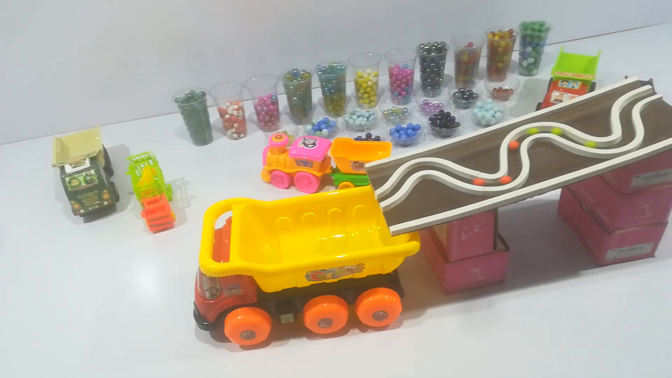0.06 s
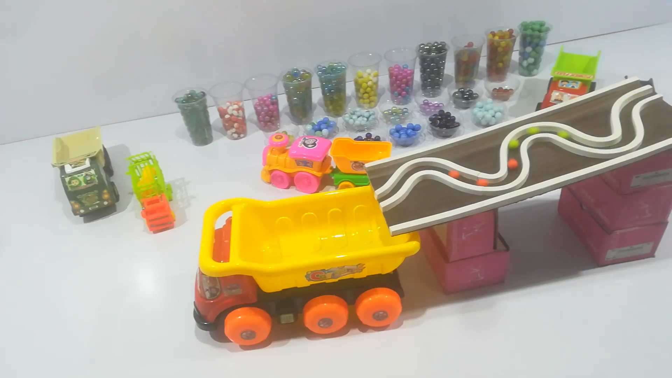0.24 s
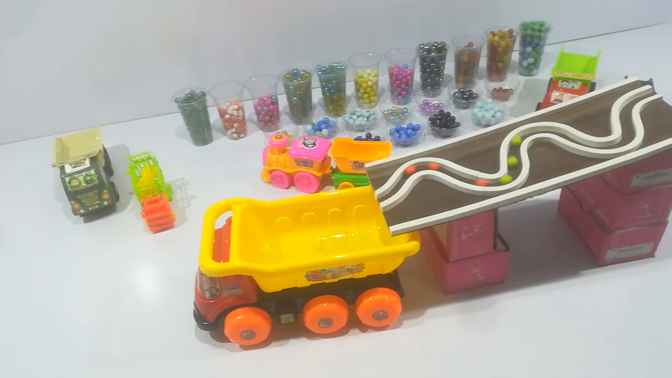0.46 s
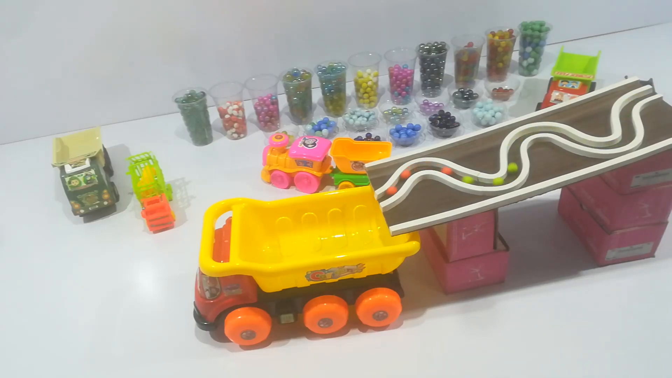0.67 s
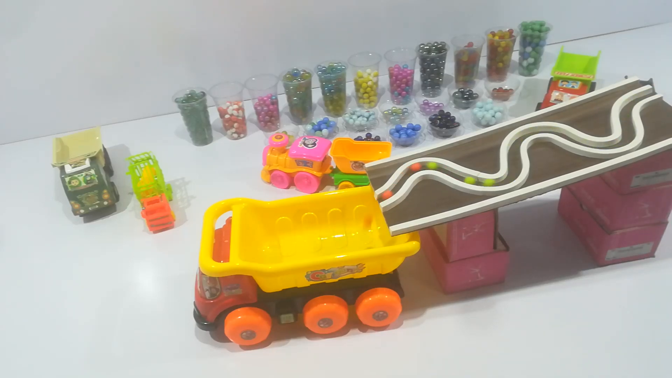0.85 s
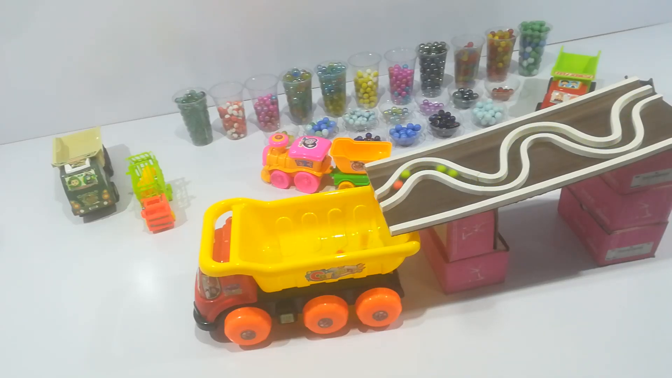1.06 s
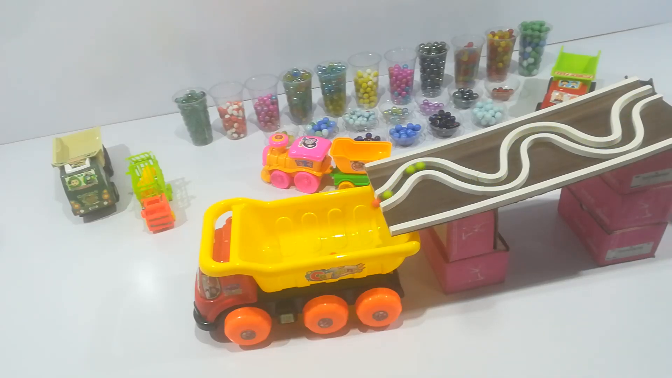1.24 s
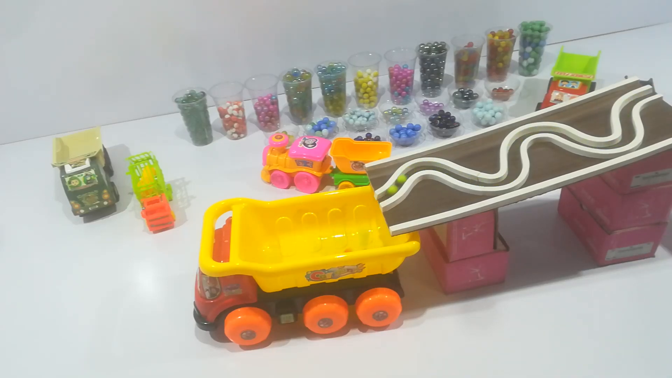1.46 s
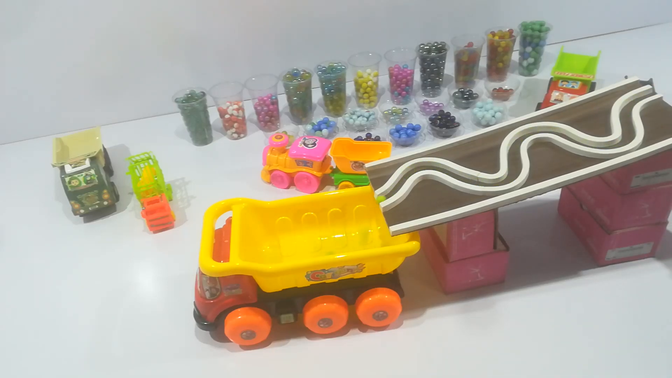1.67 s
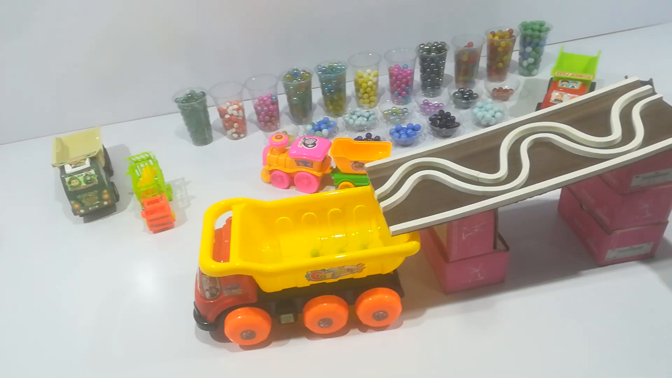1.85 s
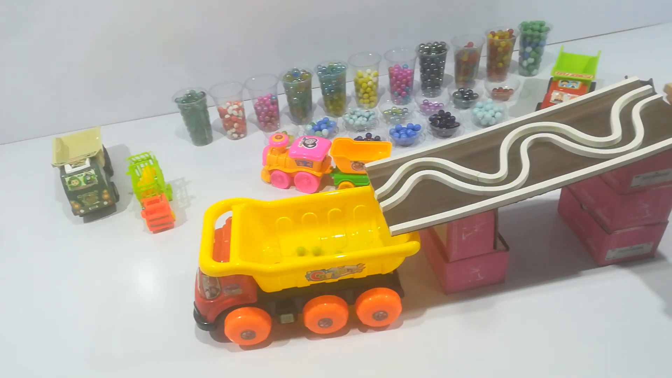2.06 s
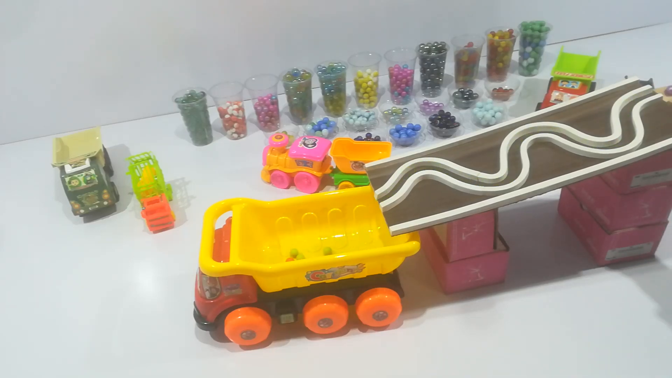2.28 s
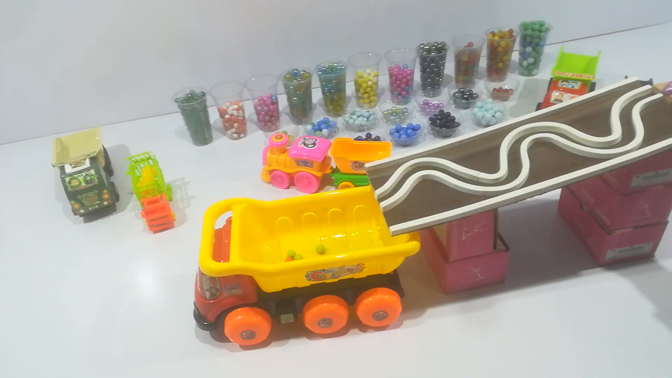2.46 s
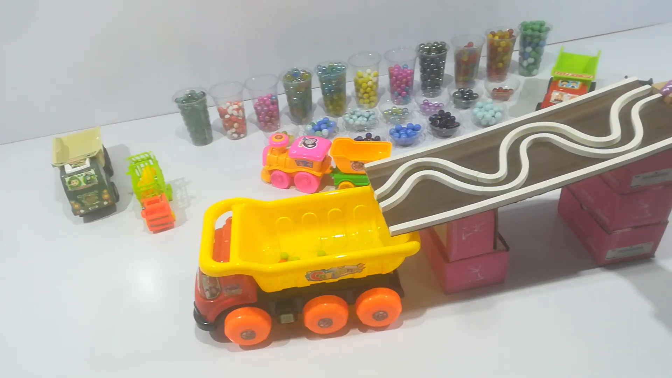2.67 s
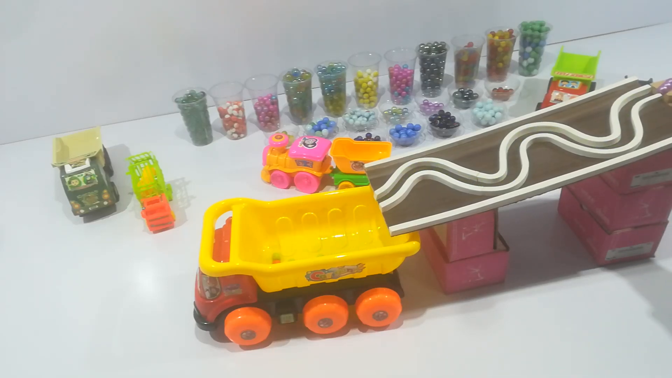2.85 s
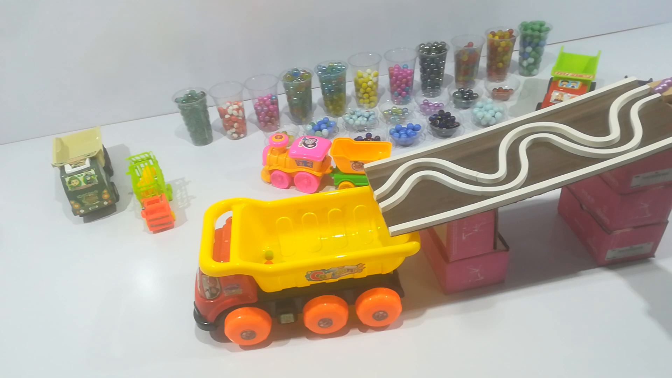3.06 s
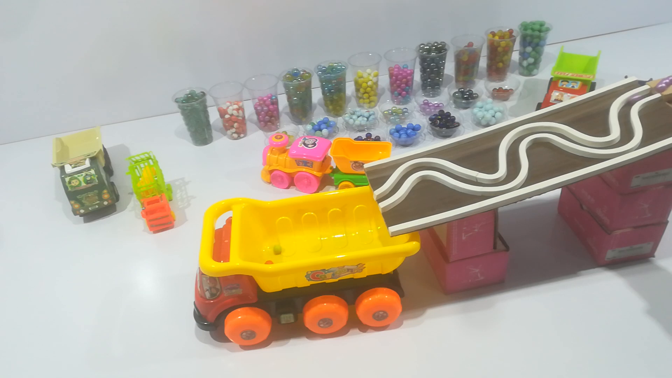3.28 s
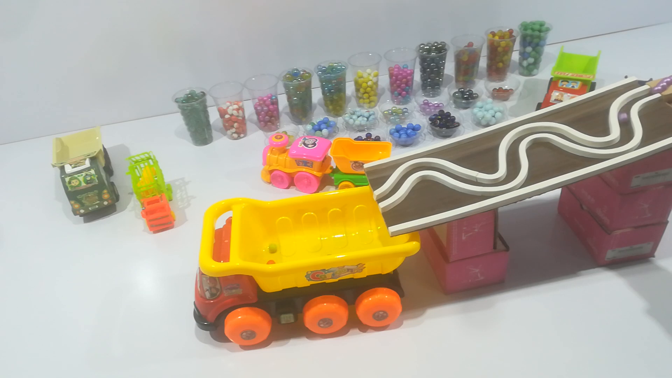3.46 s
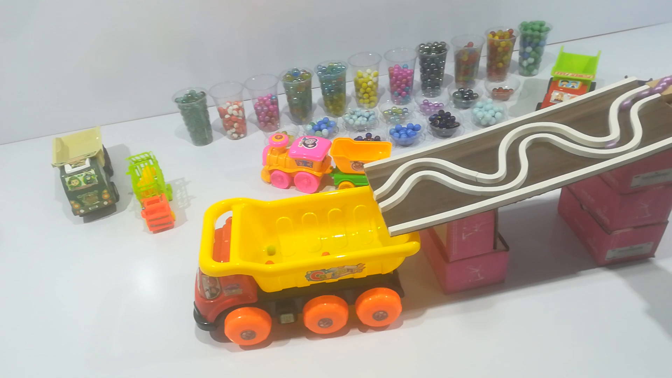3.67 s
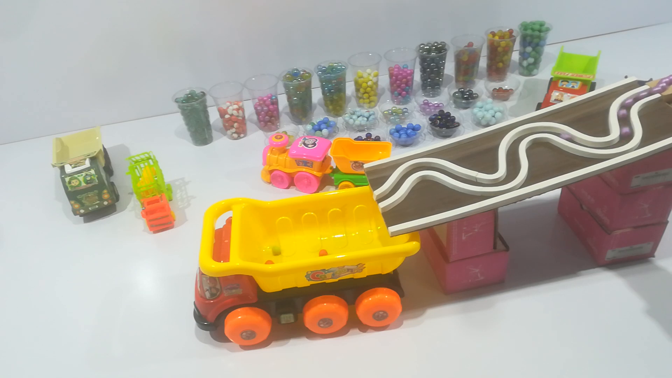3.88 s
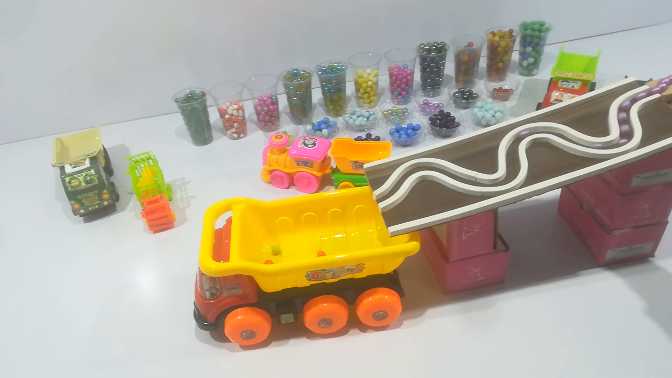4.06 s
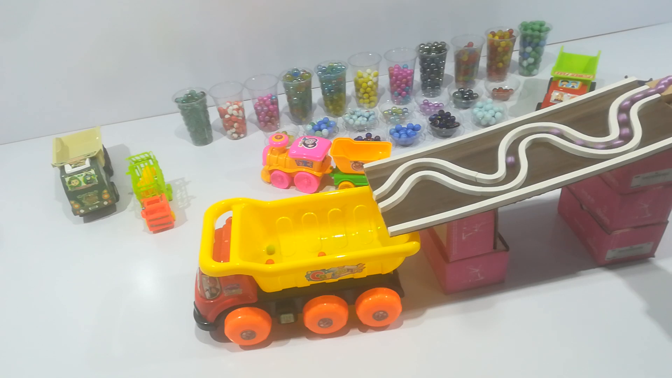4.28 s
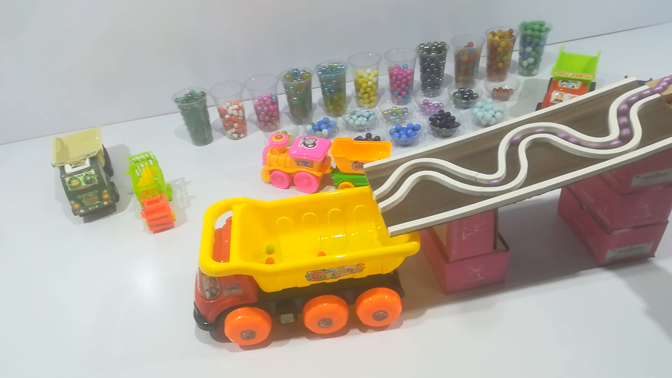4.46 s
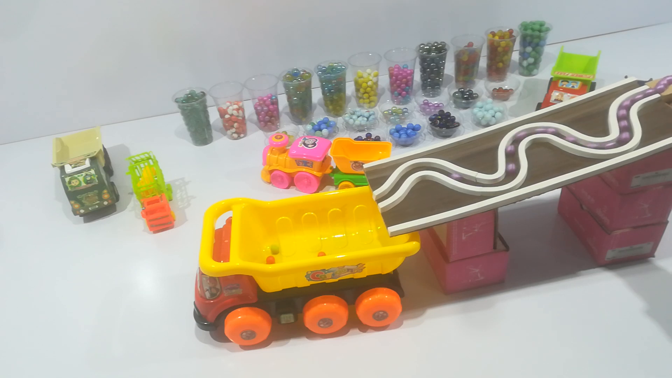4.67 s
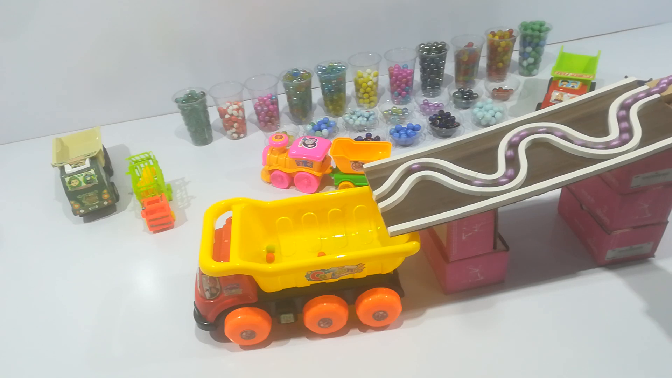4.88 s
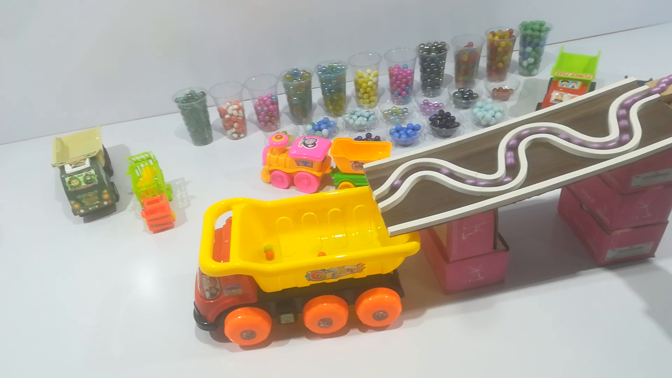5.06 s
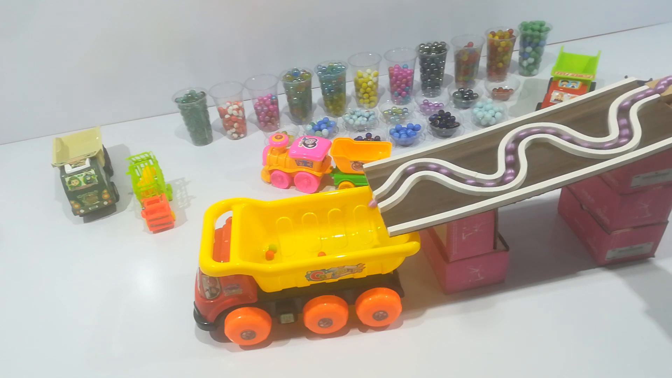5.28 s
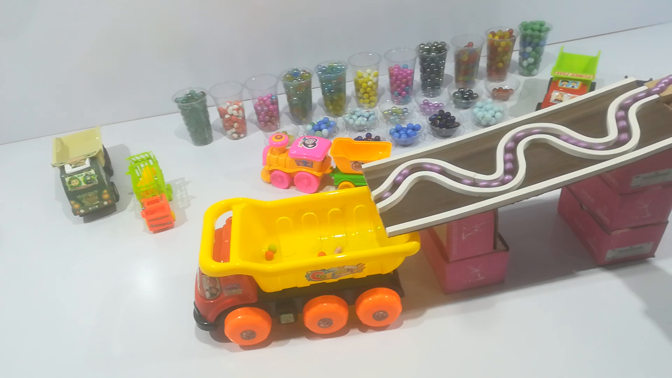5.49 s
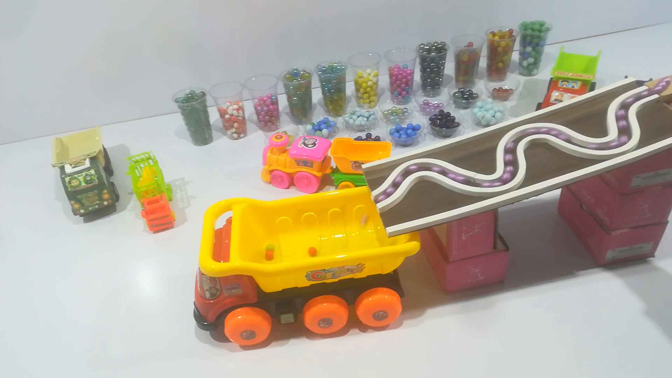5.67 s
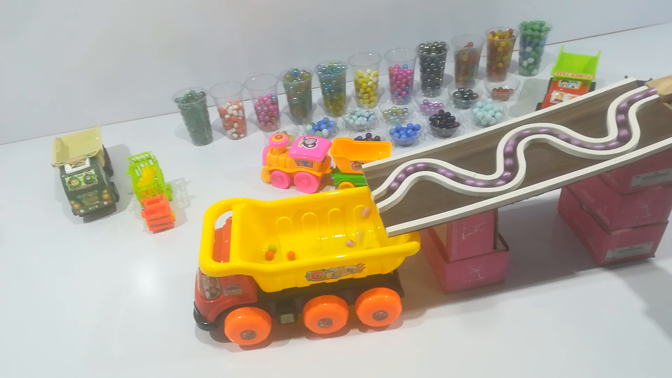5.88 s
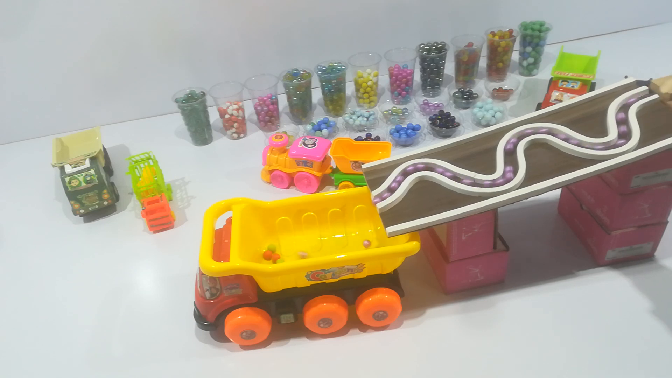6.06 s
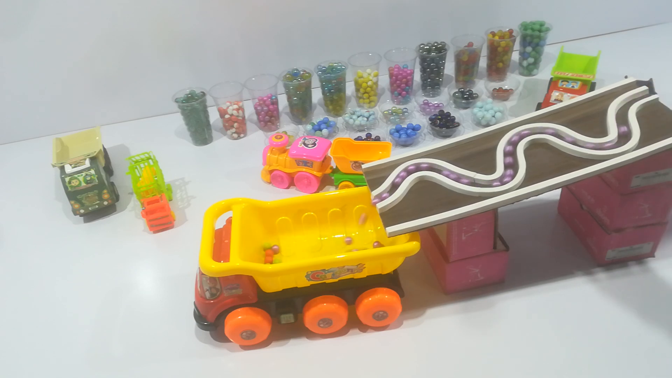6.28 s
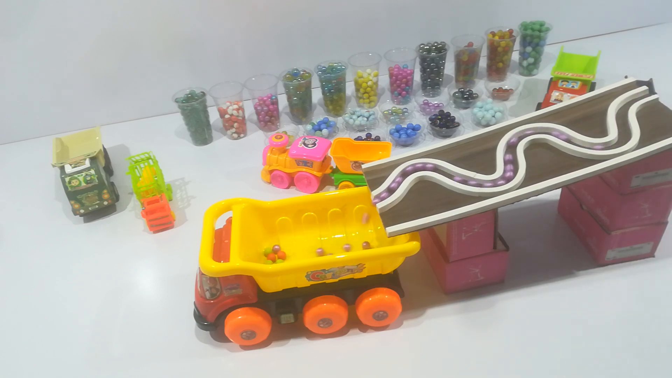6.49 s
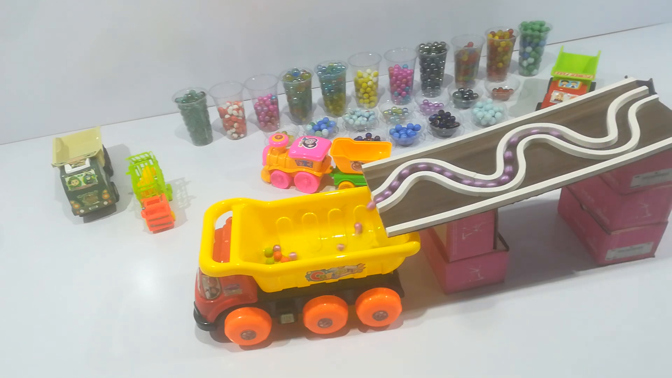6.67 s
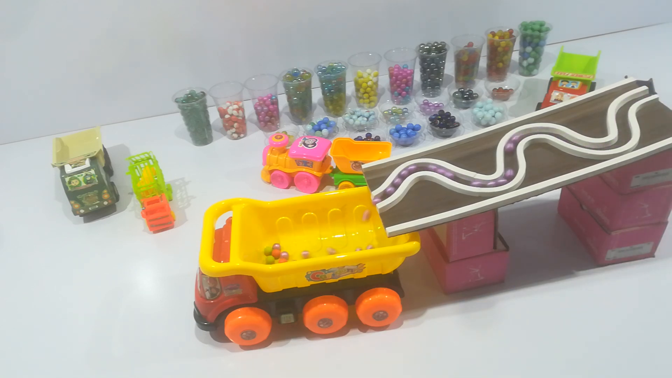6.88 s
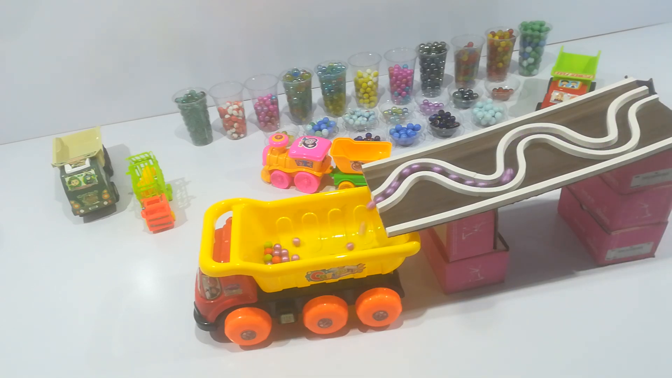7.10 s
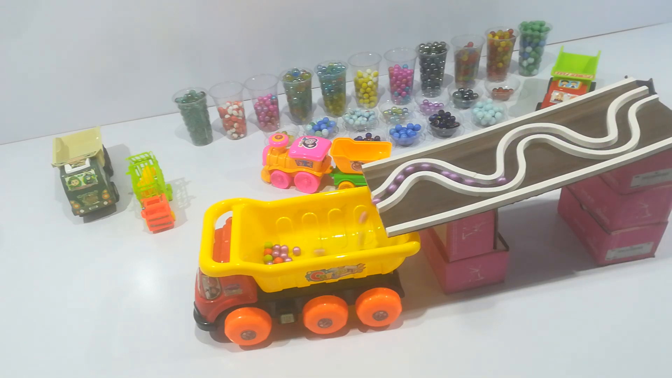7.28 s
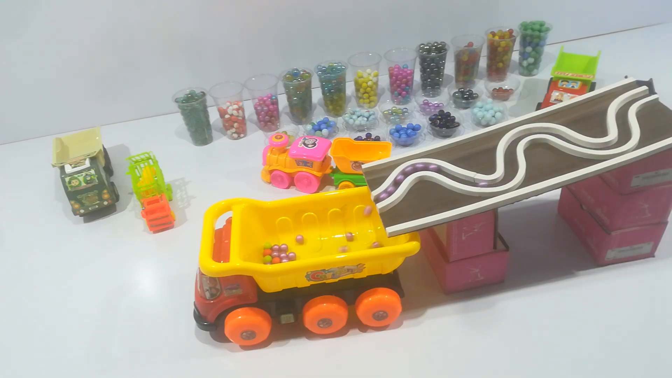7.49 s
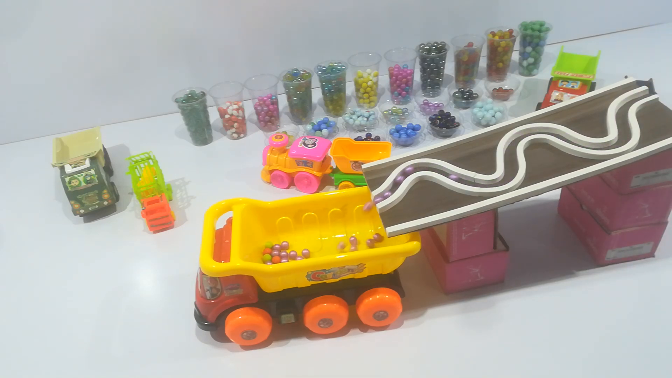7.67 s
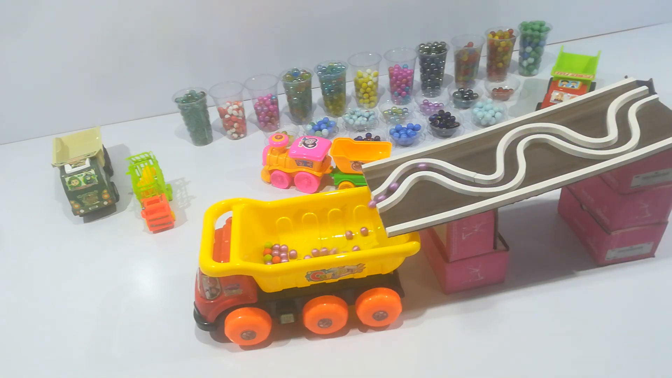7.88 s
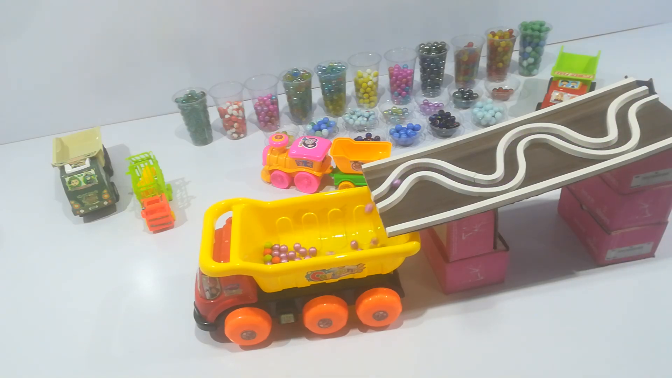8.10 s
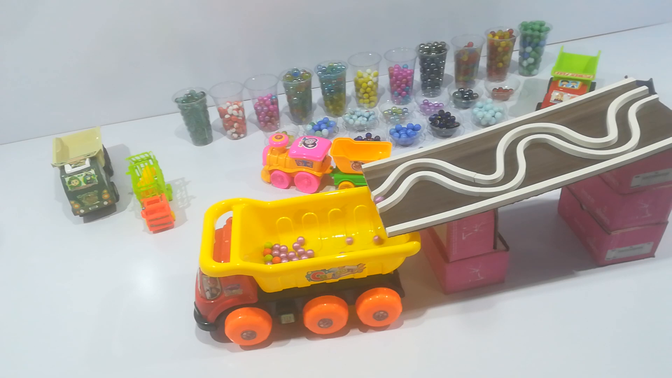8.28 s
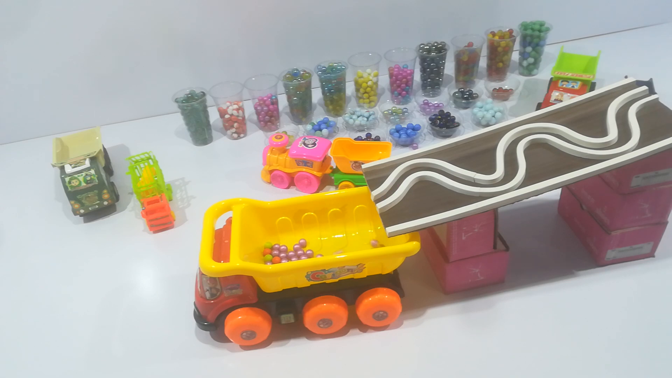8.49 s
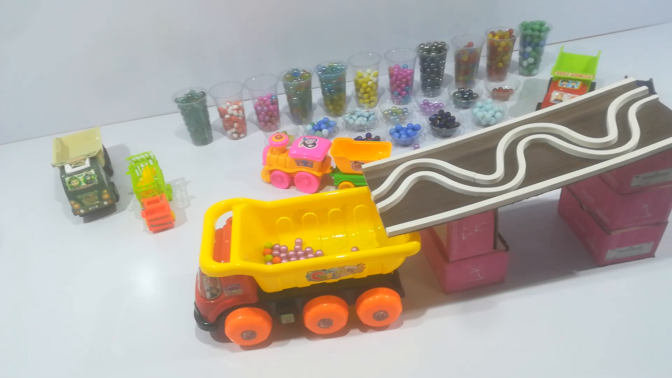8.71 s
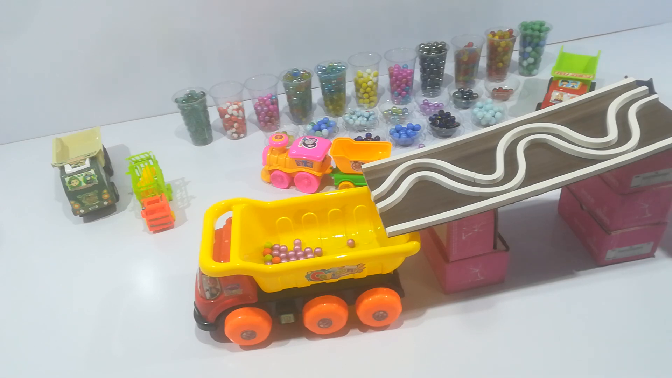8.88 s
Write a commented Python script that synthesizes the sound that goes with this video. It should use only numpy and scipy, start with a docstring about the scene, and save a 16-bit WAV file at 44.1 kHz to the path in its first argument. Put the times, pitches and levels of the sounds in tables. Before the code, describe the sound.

A small quiet room, heard close in stereo, with faint hiss, a thin high whine and low room air. From 0 seconds a few glass marbles roll softly down a winding plastic track with light ticks. From about 0.9 to 2.1 they drop into a hollow plastic truck bed in loud, dry, boxy clacks roughly a tenth of a second apart, bouncing and rolling out by 2.3. The hiss eases and it is nearly still until 3.1, when light taps, clicks and short bright glass scrapes mark marbles being placed on the track. Rolling builds from 4 with sharper clinks. A hard knock at 5.3 starts a denser batch: irregular, rapid, fuller clacks with glass ticks and rattling, busiest from 6 to 8. Landings thin out by 8.5; a last marble drones dully across the bed, slowing, and a very faint singing rub ends it near 8.9.

```python
"""First, glass marbles roll down a winding plastic track in a small room (shaped noise of tiny impacts).
They drop into the hollow bed of a plastic toy truck, bounce, roll and click (struck modes, noise bursts).
Then marbles knock as they are set on the track, and a larger, denser batch runs down and lands.
A last marble drones across the bed and a light rub sings; faint whine, hiss and room air lie below."""
import sys
import numpy as np
from scipy import signal
from scipy.fft import rfft, irfft, next_fast_len
from scipy.io import wavfile
from scipy.ndimage import uniform_filter1d

SR = 44100
rng = np.random.default_rng(int(sys.argv[2]) if len(sys.argv) > 2 else 0)


def inscribe(sig):
    """Save sig as 16-bit PCM at rate SR to the path in sys.argv[1].

    A 1-D sig is mono; a 2-D sig holds one channel per row.
    Samples are clipped to [-1, 1] before scaling.
    """
    pcm = np.round(np.clip(np.atleast_2d(sig).T, -1, 1) * 32767)
    wavfile.write(sys.argv[1], SR, pcm.astype(np.int16))


N = 394254
RING_S, CUTOFF_HZ = 0.4, 16000
TIME = np.arange(N) / SR
AGE = np.arange(int(RING_S * SR)) / SR  # seconds since a blow
LEFT_RIGHT = np.array([[1], [-1]])
USUAL_CLACK_HZ = 1537
LOADED_FROM_S = 5.0  # from here marbles already lie in the bed

# marbles landing and bouncing in the bed: (time [s], blow level [dB], thud level [dB], clack pitch [Hz])
DROPS = [(0.8804, -2.5, -36.5, 1630), (0.999, -12, -28.5, 1290), (1.046, -3, -29, 1566),
         (1.1667, -9.5, -28, 1240), (1.2859, -26.5, -42, 1670), (1.3142, -19, -52.5, 1560),
         (1.3496, -3.5, -30, 1770), (1.4456, -1.5, -30, 1570), (1.5703, -10, -27, 1220),
         (1.6831, -1.5, -34, 1570), (1.8031, -10, -30, 1300), (1.8255, -2.5, -29.5, 1580),
         (1.9519, -9, -27.5, 1480), (1.9882, -20.5, -34.5, 1340), (2.026, -26, -44, 1800),
         (2.0794, -27.5, -54, 1770), (2.172, -37, -57, 1210), (2.2774, -46, -66, 1484),
         (5.3475, -4, -22, 1395), (5.4863, -10.5, -25.5, 1630), (5.6929, -5, -20.5, 1460),
         (5.8196, -1.5, -20.5, 1300), (5.8888, -2, -23.5, 1420), (5.9511, -6, -23, 1530),
         (6.0017, -12.5, -23, 1100), (6.0373, -11.5, -31, 1260), (6.0581, -11.5, -39.0, 1800),
         (6.1913, -3.5, -22.5, 1560), (6.2515, -6, -22, 1410), (6.3237, -2, -22.5, 1350),
         (6.3834, -9.5, -22, 1680), (6.4055, -5, -24.5, 1360), (6.446, -15, -21.5, 1540),
         (6.5095, -5, -26, 1740), (6.5298, -6.5, -23.5, 1640), (6.6072, -2, -20, 1540),
         (6.6985, -3, -18.5, 1340), (6.7677, -2, -20, 1570), (6.827, -4, -24, 1640),
         (6.899, -13, -25, 1710), (6.9288, -3.5, -21.0, 1535), (6.9515, -9, -29, 2050),
         (7.0128, -2, -21.5, 1680), (7.065, -13, -24.5, 1600), (7.1281, -4, -21.5, 1310),
         (7.1534, -10, -23.5, 1590), (7.2066, -6.5, -23, 1440), (7.232, -7, -25, 1760),
         (7.2728, -5, -23.5, 1500), (7.3113, -12, -24, 1600), (7.3273, -2, -25, 1380),
         (7.356, -8, -38.5, 1520), (7.4063, -5.5, -21.5, 1300), (7.521, -18, -20.5, 1650),
         (7.536, -2, -23.5, 1550), (7.6526, -6.5, -27, 1610), (7.6675, -8, -27.5, 1570),
         (7.7502, -3.5, -19.5, 1420), (7.8111, -3.5, -20, 1170), (7.8593, -16.5, -26, 1150),
         (7.9248, -12.5, -24, 1510), (7.97, 0.5, -26, 1630), (8.0551, -5.5, -28.5, 1420),
         (8.1756, -1.5, -31.5, 1680), (8.325, -11, -28.5, 1550), (8.417, -5, -32, 1640),
         (8.4381, -15.5, -36, 1730), (8.4926, -17, -48, 1590), (8.919, -46, -47, 1870)]
# the hollow bed as a whole: (mode [Hz], relative level [dB], t60 [s])
BED_MODES = [(251.6, 9, 0.12), (316, 0, 0.28), (402.6, -1, 0.32), (485, -0.5, 0.17), (632, 7, 0.099),
             (1010, -3.5, 0.15), (1194, -1, 0.12), (1502, 7.5, 0.027), (1587, 2, 0.055), (1722, 6, 0.018),
             (2690, -7, 0.09)]
# dense ring of bed and room: (frequency [Hz], density [dB per Hz])
BED_COLOUR = [(53, -55.5), (90, -0.5), (145, -4.5), (255, -1.5), (345, -1.5), (544, -4.5), (977, -7),
              (1350, -13), (1610, -6.5), (2500, -15.5), (6580, -32), (16000, -43.5)]
# noise of the track: (frequency [Hz], density [dB per Hz])
TRACK_COLOUR = [(71, -64.5), (130, -16), (308, -7), (778, -4), (2080, -3), (2350, -9.5), (3500, -13),
                (6350, -26.5), (10000, -35.5), (15600, -56.5)]
# crack of contact: (frequency [Hz], density [dB per Hz])
CRACK_COLOUR = [(1500, -9.5), (3000, 9.5), (5000, 6), (8000, -4), (12000, -6), (15500, -5)]
# resonances of the track: (frequency [Hz], width [Hz], lift [dB])
TRACK_PEAKS = [(304, 44, 8), (421.5, 46, 6.5), (774, 60, 9.5), (965, 75, 7.5), (1229, 92, 6),
               (1618, 240, 5)]
# left-right likeness of the bed: (frequency [Hz], correlation [-1..1])
BED_LIKENESS = [(250, 0.87), (450, 0.17), (630, -0.13), (950, 0), (1500, 0.74), (3000, 0.06)]
# balance of the bed: (frequency [Hz], left minus right [dB])
BED_BALANCE = [(150, -2.5), (380, 4), (670, 8), (1290, 1.5), (2400, 3.5), (8000, 0.5), (15000, -10)]
BED_PLACE = (BED_LIKENESS, BED_BALANCE)
# the same two for the track: (frequency [Hz], correlation [-1..1]), (frequency [Hz], left minus right [dB])
TRACK_PLACE = ([(300, 0.87), (530, -0.18), (1400, 0.29), (2500, -0.15)], [(150, 2.5), (400, 3), (900, 1.5), (2000, 7.5), (4000, 0.5),
                                        (10000, -6.5)])
# the same pair for the room: (frequency [Hz], correlation [-1..1]), (frequency [Hz], left minus right [dB])
ROOM_PLACE = ([(150, 0.88), (2000, .1)], [(150, 0.5), (4000, 4.05), (12000, 13)])


def from_db(db):
    """Decibels to gain."""
    return 10 ** (np.asarray(db) / 20)


def rms_one(x):
    """Scale to unit power."""
    return x / np.sqrt(np.mean(x ** 2) + 1e-20)


def level(rows):
    """Gain over time from (time [s], level [dB]) rows, silent outside them."""
    return from_db(np.interp(TIME, *np.transpose(rows), left=-140, right=-140))


def at_hz(points, hz):
    """Read a table on a log-frequency axis."""
    f, value = np.transpose(points)
    return np.interp(np.log(hz + 1), np.log(f), value)


def fade(t60):
    """Free exponential decay, 60 dB in t60 seconds."""
    return from_db(-60 * AGE / t60)


def drift(rate):
    """Slow random drift of unit rms, with `rate` knots per second."""
    knots = rng.standard_normal(int(N / SR * rate) + 2)
    return rms_one(np.interp(TIME * rate, np.arange(len(knots)), knots))


def add(out, s, sound):
    """Mix a sound in from time s."""
    i = max(round(s * SR), 0)
    out[:, i:i + sound.shape[1]] += sound[:, :max(N - i, 0)]


def coloured(white, spectrum, place, peaks=()):
    """Shape two unrelated excitations into stereo with a spectrum and resonances; the middle has rms 1."""
    n = white.shape[1]
    size = next_fast_len(n)
    hz = np.arange(size // 2 + 1) * SR / size
    lift = sum(db / (1 + (2 * (hz - f) / width) ** 2) for f, width, db in peaks)
    mid, side = rfft(white, size) * from_db(at_hz(spectrum, hz) + lift)
    likeness, balance = place
    alike = np.clip(at_hz(likeness, hz), -0.7, 0.99)
    pair = mid + LEFT_RIGHT * side * np.sqrt((1 - alike) / (1 + alike))
    pair = pair * from_db(LEFT_RIGHT * at_hz(balance, hz) / 2)
    out = irfft(pair, size)[:, :n]
    return out / np.std(out.mean(axis=0))


def burst(spectrum, place, t60, peaks=()):
    """Countless close modes struck at once and dying away."""
    return coloured(rng.standard_normal((2, len(AGE))), spectrum, place, peaks) * fade(t60)


def even_burst(spectrum, place, t60, even_hz=170):
    """A dying ring like burst, but a short blow feeds all pitches alike."""
    white = rng.standard_normal((2, len(AGE)))
    power = np.abs(rfft(white * fade(t60))) ** 2
    power = uniform_filter1d(power, max(round(even_hz * RING_S), 1))
    even = irfft(rfft(white) / np.sqrt(power), len(AGE))
    return coloured(even, spectrum, place) * fade(t60)


def shelf(x, kind, hz, gain_db):
    """Raise or lower the lows or the highs."""
    band = signal.sosfilt(signal.butter(1, hz, kind, fs=SR, output="sos"), x)
    return x + (from_db(gain_db) - 1) * band


def small_body(x, edge_hz):
    """A toy this small radiates almost no bass."""
    return signal.sosfilt(signal.butter(4, edge_hz, "high", fs=SR, output="sos"), x + 1e-18)


def bumps(per_s, spread_db):
    """Tiny impacts of uneven size at random times as glass runs over plastic."""
    sizes = from_db(spread_db * np.minimum(rng.exponential(1, (2, N)), 4))
    signs = rng.choice([-1, 1], (2, N))
    return sizes * signs * (rng.random((2, N)) < per_s / SR)


def reverberant(x, tail_db, t60):
    """Each tiny impact leaves a diffuse noise tail in the plastic and the room."""
    hold = from_db(-120 / (t60 * SR))  # energy kept per sample
    energy = signal.lfilter([1 - hold], [1, -hold], np.mean(x ** 2, axis=0) + 1e-18)
    return x + from_db(tail_db) * np.sqrt(energy) * rng.standard_normal((2, N))


def knocks(per_s, t60, low_hz=300, high_hz=4200, range_db=12):
    """Light separate knocks at random; each rings a few pitches of its own spot from its own direction."""
    out, age = np.zeros((2, N)), AGE[AGE < t60]
    for when, softness, angle, *spots in rng.random(size=(round(per_s * N / SR), 9)):
        hz = low_hz + (high_hz - low_hz) * np.array(spots)
        ring = np.cos(2 * np.pi * np.outer(hz, age)).sum(axis=0) * fade(t60)[:len(age)]
        direction = [np.cos(2 * np.pi * angle), np.sin(2 * np.pi * angle)]
        add(out, when * N / SR, from_db(-range_db * softness) * np.outer(direction, ring))
    return rms_one(out)


def drops(modes_db=-25.0, ring_db=-15.0, early_db=-11.5, crack_db=6.0, treble_db=13.0):
    """A landing is a crack of contact, the slap of the wall, then the ring of the hollow bed in the room."""
    thud_edge_hz, usual_thud_db, thud_range_db = 740, -17, 14  # usual thud relative to the blow
    jolt_s, jolt_db = 0.0028, -8.5
    contact, body = np.zeros((2, 2, N))
    sides = from_db(LEFT_RIGHT / 2 * at_hz(BED_BALANCE, USUAL_CLACK_HZ))
    spread = 1 - np.exp(-AGE / 0.00048)  # the blow takes a moment to travel through the bed
    for (s, blow_db, thud_db, clack_hz), late in zip(DROPS, rng.random(len(DROPS))):
        bright_db, _ = fill_at(s)
        # spots on the floor or the walls give more or less thud
        thud_lift_db = np.clip(thud_db - blow_db - usual_thud_db, -thud_range_db, thud_range_db)
        ring = from_db(ring_db) * even_burst(BED_COLOUR, BED_PLACE, t60=0.18)
        ring = ring + from_db(modes_db) * bed_ring()
        ring = ring + from_db(early_db) * even_burst(BED_COLOUR, BED_PLACE, t60=0.028)
        ring = shelf(ring, "low", thud_edge_hz, thud_lift_db)
        ring = shelf(ring, "high", hz=4930, gain_db=treble_db + 0.5 * bright_db)
        add(body, s, from_db(blow_db) * ring * spread)
        crack = from_db(bright_db + crack_db) * burst(CRACK_COLOUR, BED_PLACE, t60=0.0053)
        wall = sides * shelf(slap(clack_hz), "low", thud_edge_hz, thud_lift_db)
        add(contact, s, from_db(blow_db) * (crack + wall))
        if s > LOADED_FROM_S:
            # marbles jolted off the floor knock back onto it
            knock_back = from_db(blow_db + jolt_db) * (crack + sides * slap(clack_hz))
            add(contact, s + jolt_s * (1 + 0.5 * late), knock_back)
    # a little of each blow passes through the wheels into the table
    table = from_db(-20.5) * body
    return small_body(contact, edge_hz=202) + small_body(body, edge_hz=223) + table


def slap(clack_hz, follows=0.4, detune=0.036, vary_db=1.5, contact_s=0.0005, slap_db=0.58):
    """The marble pushes the wall in; it swings back in a mix of modes that changes with the spot."""
    # wall right under a blow at the usual clack pitch: (mode [Hz], level [dB], t60 [s])
    wall_modes = [(323, -14, 0.018), (612, -21, .026), (790, -24, 0.011), (1246, -14, 0.021),
                  (1597, -8.5, 0.02), (1922, -16.5, .022), (2835, -27.5, .02), (3460, -24, 0.036)]
    pitch, strength = 2 * rng.random((2, len(wall_modes))) - 1
    shifts = (clack_hz / USUAL_CLACK_HZ) ** follows * (1 + detune * pitch)
    swings = 0
    for (hz, db, t60), shift, more_db in zip(wall_modes, shifts, vary_db * strength):
        swing = np.cos(2 * np.pi * hz * shift * (AGE - contact_s))
        swings = swings + from_db(db + more_db) * fade(t60) * swing
    return -from_db(slap_db) * swings * np.minimum(AGE / contact_s, 1) ** 2


def bed_ring(vary_db=3.0):
    """Every spot excites the bed modes with other strengths; each reaches the two sides out of step."""
    out, sides = 0, LEFT_RIGHT / 2
    for hz, db, t60 in BED_MODES:
        phase = sides * np.arccos(np.clip(at_hz(BED_LIKENESS, hz), -1, 1))
        spot_db = vary_db * (2 * rng.random() - 1.5)
        strength = rng.choice([-1, 1]) * from_db(db + spot_db + sides * at_hz(BED_BALANCE, hz))
        out = out + strength * fade(t60) * np.sin(2 * np.pi * hz * AGE + phase)
    return out


def fill_at(s):
    """Crack and rattle gains in dB at time s, as the bed fills with glass."""
    # (from [s], crack of a blow [dB], rattle after a blow [dB])
    bed_fill = [(0, -24, -39), (5.0, -21, -27.5), (7.6, -19.5, -29.5)]
    return [row[1:] for row in bed_fill if row[0] <= s][-1]


def grazes(min_s=0.0014, spread_s=0.0024, graze_db=-28.5):
    """Glass ticks on glass an instant before each blow in a loaded bed."""
    out = np.zeros((2, N))
    for (s, blow_db, *_), early in zip(DROPS, rng.random(len(DROPS))):
        if s > LOADED_FROM_S:
            tick = burst(CRACK_COLOUR, BED_PLACE, t60=0.014)
            add(out, s - min_s - spread_s * early, from_db(blow_db + graze_db) * tick)
    return out


def bed_roll(roll_db=0.0, mode_width_hz=24, mode_lift_db=8.5, slowing=1.94, follows=0.37):
    """Each blow sends marbles rattling and clacking across the bed until friction stops them."""
    roll_out_s, roll_out_follows = 0.38, 0.11  # time after a 0 dB blow; power of the strength
    power = np.zeros((1, N))
    for s, blow_db, *_ in DROPS:
        _, rattle_db = fill_at(s)
        roll_s = roll_out_s * from_db(roll_out_follows * blow_db)
        speed = np.linspace(1, 0, int(roll_s * SR))[None] ** slowing
        add(power, s, (from_db(rattle_db + follows * blow_db) * speed) ** 2)
    peaks = [(hz, mode_width_hz, mode_lift_db) for hz, _, _ in BED_MODES]
    grain = rms_one(reverberant(bumps(per_s=150, spread_db=2.5), tail_db=6.5, t60=0.027))
    clacks = from_db(-10.5) * knocks(per_s=80, t60=0.014)
    rattle = coloured(grain + clacks, BED_COLOUR, BED_PLACE, peaks)
    rattle = small_body(shelf(rattle, "high", hz=4200, gain_db=4.5), edge_hz=327)
    return from_db(roll_db + drift(40)) * np.sqrt(power) * rattle


def last_marble(slowing_db_per_s=19.5, edge_s=0.011):
    """Rolling out slowly, the last marble of a batch leaves only the dull drone of the bed floor."""
    # (start [s], stop [s], level at the start [dB])
    roll_rows = [(1.394, 2.298, -41.5), (7.882, 8.916, -39.5)]
    spectrum = [(300, -38), (440, -2.0), (530, 6.0), (680, 2.0), (1200, -50.5)]
    drone = coloured(bumps(per_s=2700, spread_db=-3.5), spectrum, BED_PLACE)
    gain = 0
    for start, stop, db in roll_rows:
        rolling = np.clip(np.minimum(TIME - start, stop - TIME) / edge_s, 0, 1)
        gain = gain + rolling * from_db(db - slowing_db_per_s * np.maximum(TIME - start, 0))
    return drone * gain


def rub(start_s=8.812, rub_db=-51.5, attack_s=0.018, t60_s=0.28):
    """A last light rub of the plastic sings in two narrow resonances."""
    spectrum = [(300, -46), (1000, 8), (3200, -2), (7000, -39)]
    peaks = [(1600, 150, 19), (2330, 290, 16)]
    sing = coloured(bumps(per_s=1200, spread_db=-1.0), spectrum, BED_PLACE, peaks)
    envelope = np.zeros((1, N))
    add(envelope, start_s, (np.minimum(AGE / attack_s, 1) * fade(t60_s))[None])
    return from_db(rub_db) * envelope * sing


def track_traffic(run_s=2.227, speed_up_s=0.52, push_speed=0.088):
    """Loudness of the track: marbles set off in turn, gather speed, fall silent as they leave its end."""
    # (first marble lands [s], last marble lands [s], marbles [count, rounded], level of one [dB])
    batches = [(0.865, 1.7, 12, -54), (5.355, 8.382, 34.8, -46.5)]
    power = np.zeros(N)
    age = np.arange(int(run_s * SR)) / SR
    speed = 1 - (1 - push_speed) * np.exp(-age / speed_up_s)  # share of full speed
    for first_s, last_s, marbles, db in batches:
        for lands in (np.linspace(first_s, last_s, round(marbles)) * SR).astype(int):
            power[max(lands - len(age), 0):lands] += (from_db(db) * speed[-lands:]) ** 2
    return np.sqrt(power)


def track_roll(traffic, sway_db=1.0):
    """Marbles rumble over the grain of the track and knock lightly against its walls."""
    grain = rms_one(reverberant(bumps(per_s=1200, spread_db=2.0), tail_db=-2.0, t60=0.06))
    rattle = from_db(-11.5) * knocks(per_s=130, t60=0.018)
    rumble = coloured(grain + rattle, TRACK_COLOUR, TRACK_PLACE, TRACK_PEAKS)
    return rumble * traffic * from_db(sway_db * drift(60))


def grind(traffic, catch_db=7.5, along_db=-31.0):
    """Touching marbles spin and catch in short bright scrapes, faintly all along the run."""
    # neighbours grinding glass on glass: (middle [s], length [s], level [dB])
    scrape_rows = [(3.524, 0.18, -58), (3.92, 0.096, -53), (4.903, 0.75, -61)]
    spectrum = [(3000, -19.0), (8900, 7.5), (12000, -13.5)]
    scrape = coloured(bumps(per_s=600, spread_db=2.5), spectrum, TRACK_PLACE)
    pressure = from_db(along_db) * traffic[None]
    for s, length, db in scrape_rows:
        swell = np.sin(np.linspace(0, np.pi, int(length * SR)))[None]
        add(pressure, s - length / 2, from_db(db) * swell)
    return scrape * pressure * from_db(catch_db * np.minimum(drift(71), 1))


def clink(room_db=-15.0):
    """Glass on glass: a very short tick and its faint trace in the room."""
    # (frequency [Hz], density [dB per Hz])
    glass_colour = [(1500, -22), (3500, 4.5), (8000, -4), (12000, -14.5)]
    tick = burst(glass_colour, TRACK_PLACE, t60=0.014)
    return tick + from_db(room_db) * burst(glass_colour, TRACK_PLACE, t60=0.22)


def clinks(traffic, clear_db=-6.0, track_db=-10.0, jostle_db=-6.5):
    """Single clicks that the track answers, and lighter jostling ones, louder as marbles gather speed."""
    # (time [s], level [dB])
    clink_rows = [(0.244, -37), (0.367, -39), (0.6759, -40), (2.2194, -42.5), (2.27, -50), (4.1374, -40),
                  (4.254, -38), (4.312, -26.5), (4.4674, -32), (4.5417, -24.5), (4.6176, -27),
                  (4.7007, -23), (5.0474, -23.5), (5.129, -24), (5.209, -24), (5.585, -24.5)]
    out = np.zeros((2, N))
    for s, peak_db in clink_rows:
        answer = from_db(track_db) * burst(TRACK_COLOUR, TRACK_PLACE, t60=0.13, peaks=TRACK_PEAKS)
        add(out, s, from_db(peak_db) * (from_db(clear_db) * clink() + answer))
    for when, softer_db in rng.uniform([0, 0], [1, 10], size=(170, 2)):
        i = int(when * N)
        add(out, i / SR, traffic[i] * from_db(jostle_db - softer_db) * clink())
    return out


def taps(knock_db=-20.0, crack_db=-8.0, room_db=-14.0, thump_db=-32.5):
    """A marble set down or striking a wall makes the track click, ring and thump on its supports."""
    # (time [s], level [dB], ring of the track [dB re level])
    tap_rows = [(0.481, -35.5, -2), (2.367, -37.5, -16), (2.399, -39.5, -18), (2.429, -40.5, -16),
                (3.126, -22, -16), (3.258, -37, -13), (3.306, -39.5, -8), (3.367, -37.5, -7.5),
                (3.453, -25.5, -21), (3.581, -25.5, -24), (3.6748, -24.5, -17), (3.735, -34, -19),
                (3.769, -34.5, -5.5), (3.8563, -25.5, -19), (3.9561, -25, -22), (4.153, -32.5, -8),
                (5.3029, -8, -8)]
    # thump: (frequency [Hz], density [dB per Hz])
    thump_colour = [(35, -18.5), (100, -14), (300, -3), (700, -64.5)]
    firm_tap_db, crack_loss_per_db = -31.0, 3.0  # softer taps lose their crack
    out = np.zeros((2, N))
    for s, peak_db, ring_db in tap_rows:
        soft_db = crack_loss_per_db * max(firm_tap_db - peak_db, 0)
        knock = from_db(knock_db) * burst(TRACK_COLOUR, TRACK_PLACE, t60=0.15, peaks=TRACK_PEAKS)
        knock = shelf(knock, "high", hz=2610, gain_db=7.0 - 0.5 * soft_db)
        ring = from_db(ring_db) * burst(TRACK_COLOUR, TRACK_PLACE, t60=0.2, peaks=TRACK_PEAKS)
        tick = burst(CRACK_COLOUR, TRACK_PLACE, t60=0.009)
        room = from_db(room_db) * burst(CRACK_COLOUR, TRACK_PLACE, t60=0.14)
        crack = from_db(crack_db - soft_db) * (tick + room)
        thump = from_db(thump_db) * burst(thump_colour, ROOM_PLACE, t60=0.5)
        clack = small_body(slap(clack_hz=2050), edge_hz=930)
        add(out, s, from_db(peak_db) * (knock + ring + crack + thump + clack))
    return out


def background(air_db=-65, whine_pan_db=12.5, waver_hz=2.0):
    """Still air of the room, and hiss with a thin wavering whine from the electronics."""
    # still air: (frequency [Hz], density [dB per Hz])
    air_colour = [(20, -7), (118, -4.5), (286, -13), (4000, -41.5), (5200, -75)]
    # hiss: (frequency [Hz], density [dB per Hz])
    hiss_colour = [(1000, 7.5), (4000, -1.5), (11500, 0), (13500, -4.5), (15000, 3.5)]
    # electronic noise: (time [s], level [dB])
    electronics_rows = [(0, -60), (2.28, -61), (2.48, -68), (8.94, -75.5)]
    # partials of the whine: (frequency [Hz], level before panning [dB re hiss])
    whine_partials = [(4330, -21.5), (8660, -19.5), (12990, -9)]
    air = from_db(air_db) * coloured(rng.standard_normal((2, N)), air_colour, ROOM_PLACE)
    hiss = coloured(rng.standard_normal((2, N)), hiss_colour, ROOM_PLACE)
    waver = np.cumsum(waver_hz * drift(30)) / SR  # cycles
    whine = 0
    for hz, db in whine_partials:
        whine = whine + from_db(db) * np.sqrt(2) * np.sin(2 * np.pi * (hz * TIME + waver))
    return air + level(electronics_rows) * (hiss + whine * from_db(LEFT_RIGHT * whine_pan_db))


def scene():
    """Truck, track and room together."""
    traffic = track_traffic()
    truck = drops() + grazes() + bed_roll() + last_marble() + rub()
    track = track_roll(traffic) + grind(traffic) + clinks(traffic) + taps()
    return truck + track + background()


def record(dry):
    """Clip at full scale, then cut the top with a steep low-pass."""
    low_pass = signal.ellip(10, 0.1, 80, CUTOFF_HZ, fs=SR, output="sos")
    return signal.sosfilt(low_pass, np.clip(dry, -1, 1))


dry = scene()
out = record(dry)
inscribe(out)
```